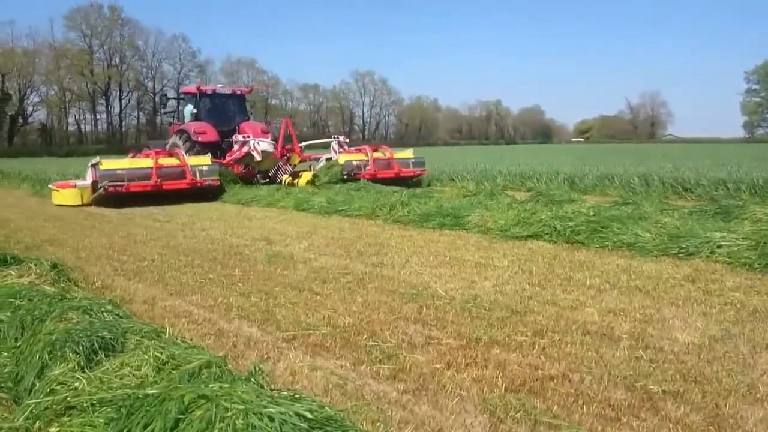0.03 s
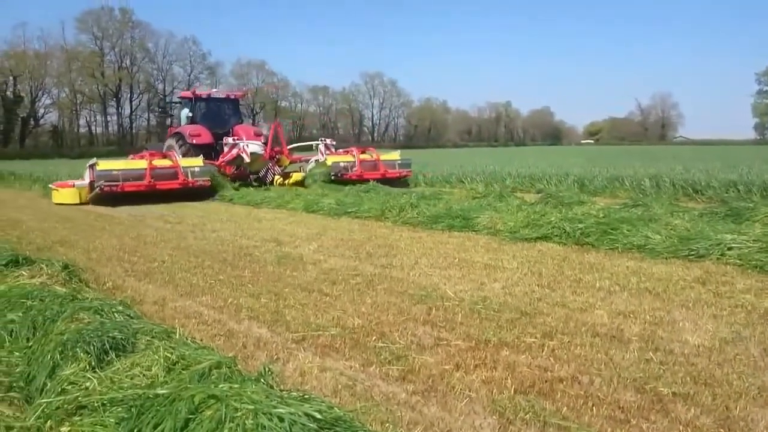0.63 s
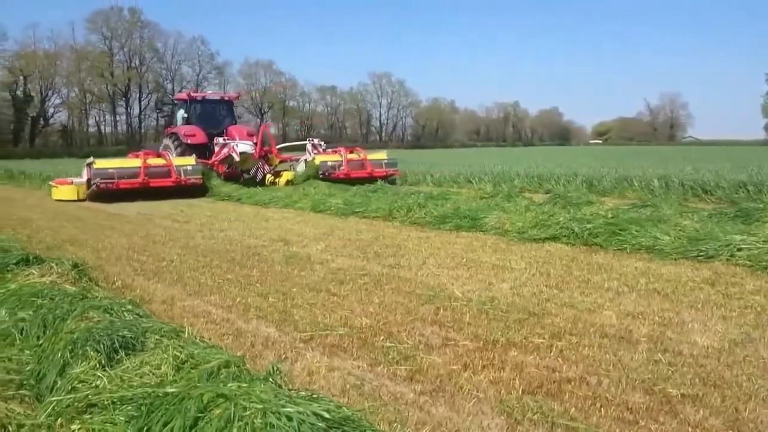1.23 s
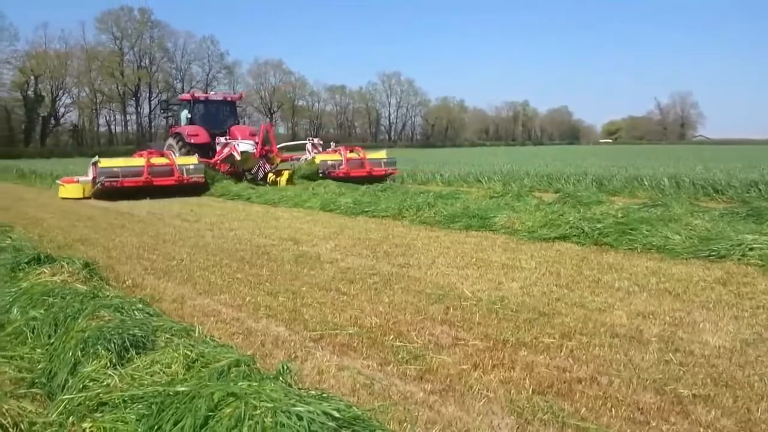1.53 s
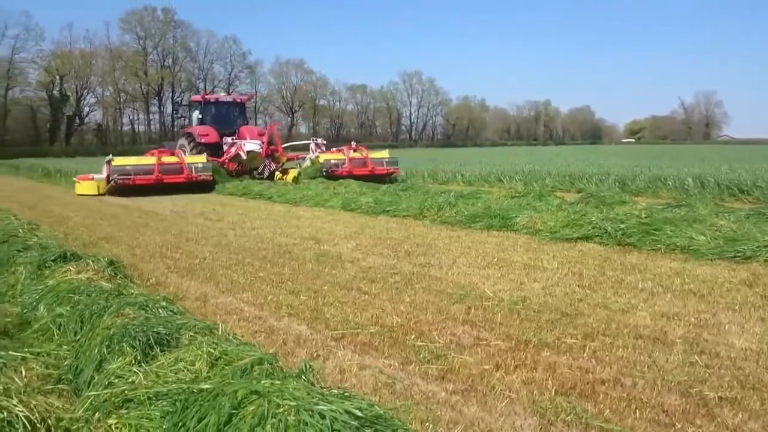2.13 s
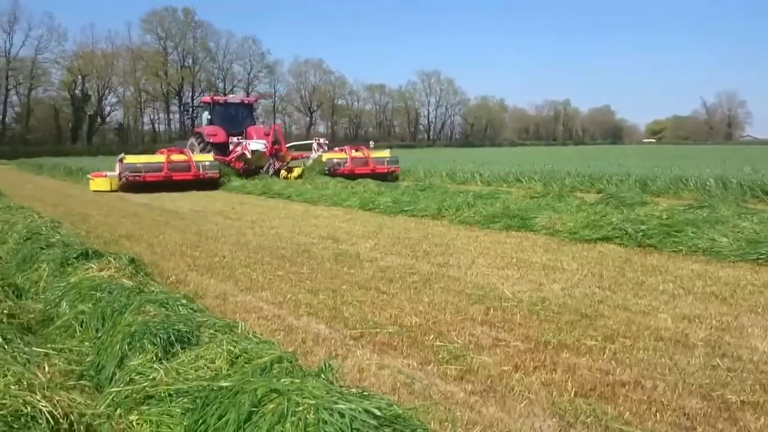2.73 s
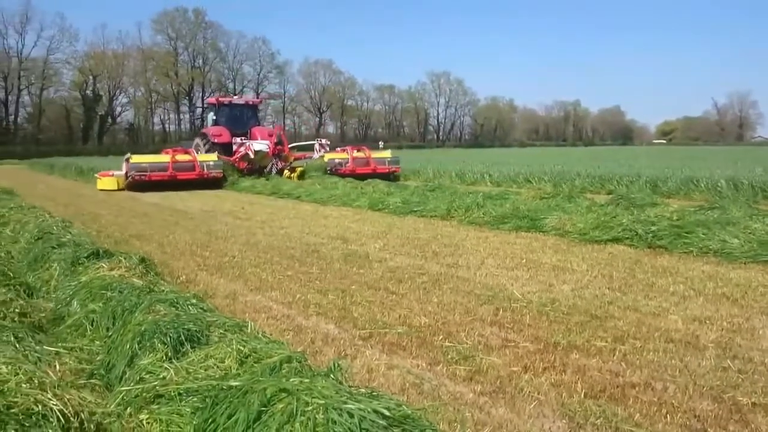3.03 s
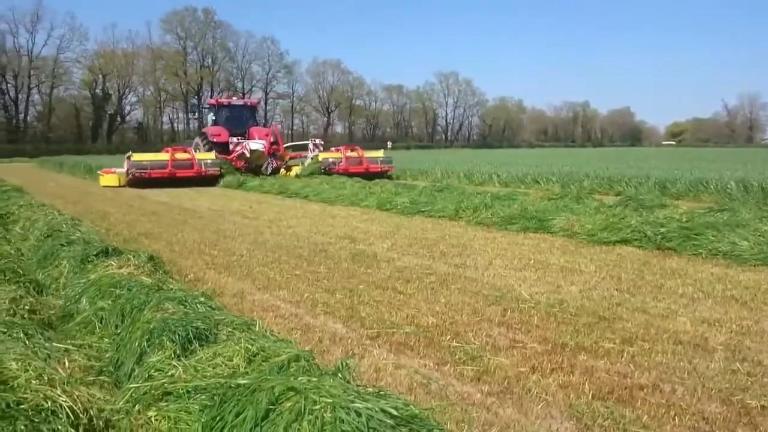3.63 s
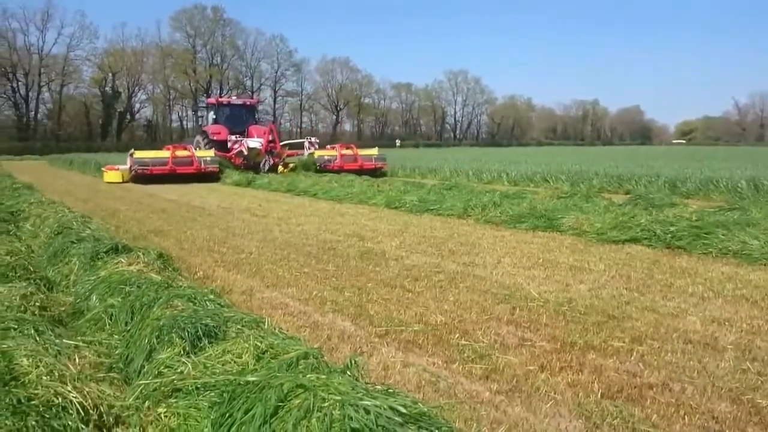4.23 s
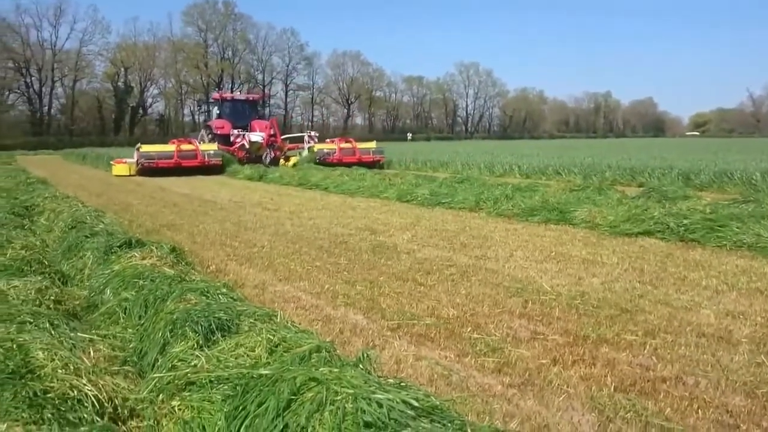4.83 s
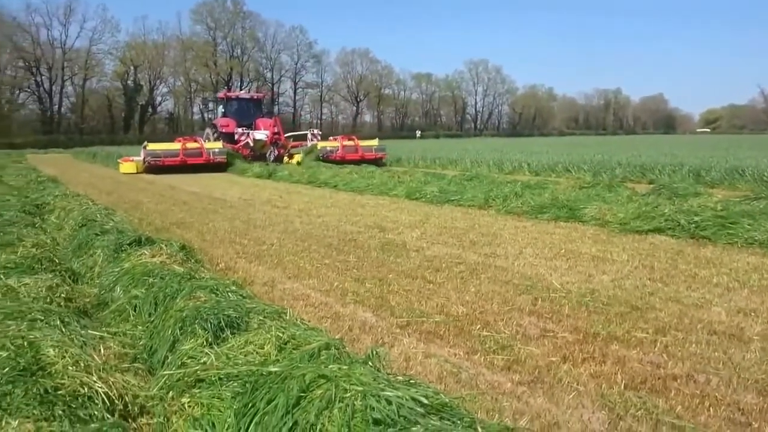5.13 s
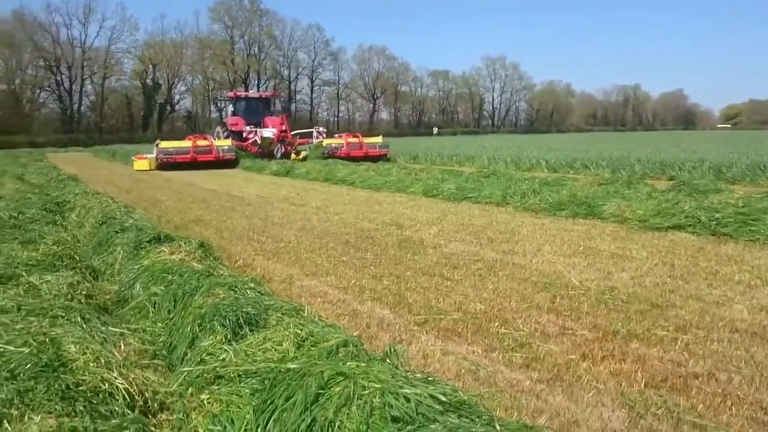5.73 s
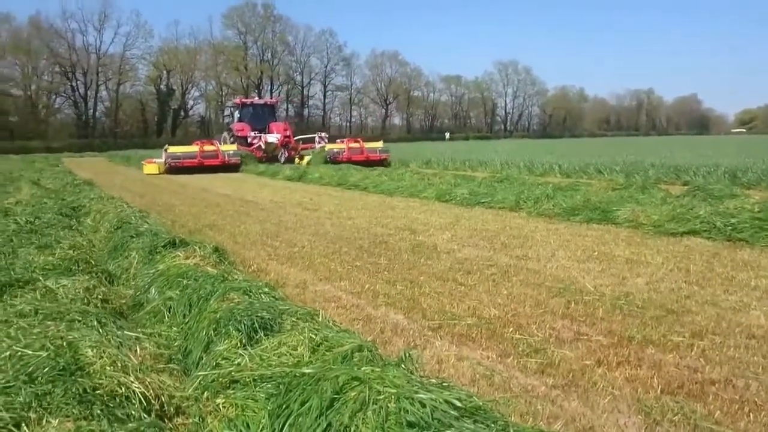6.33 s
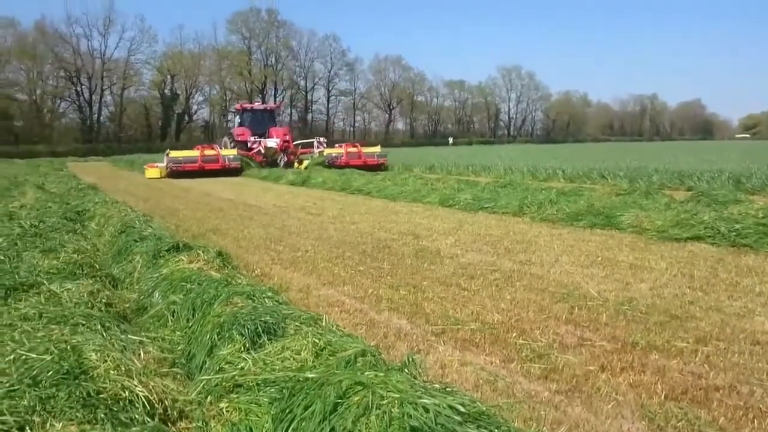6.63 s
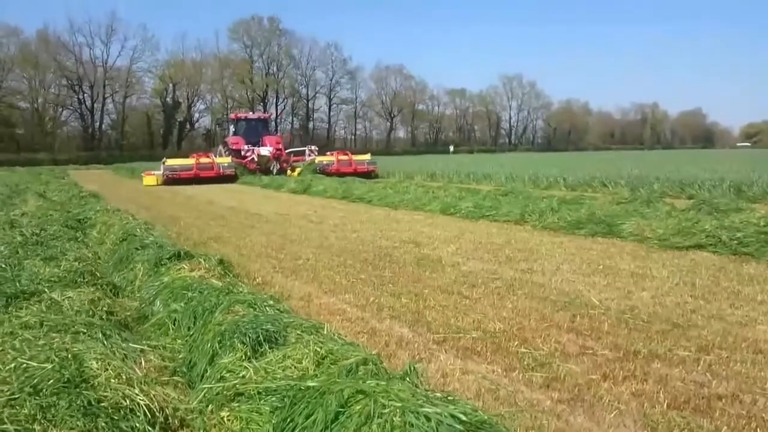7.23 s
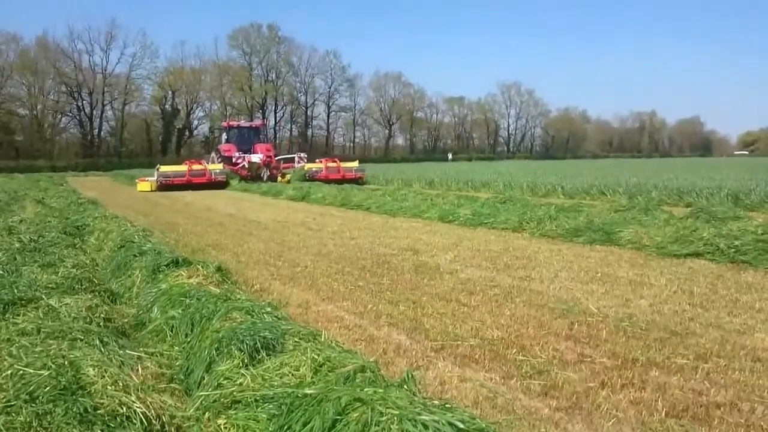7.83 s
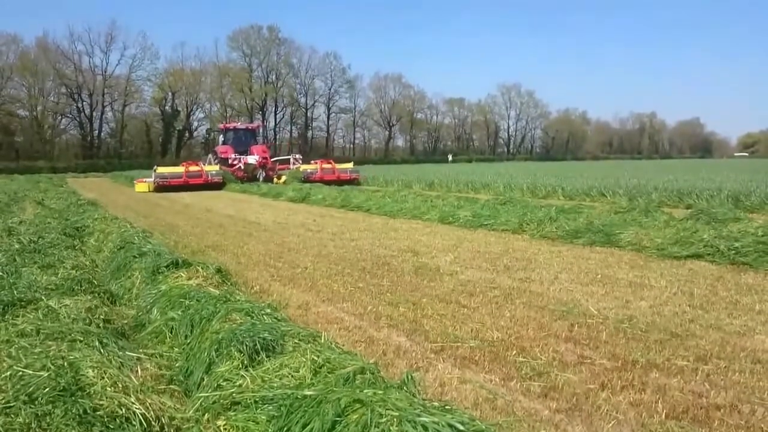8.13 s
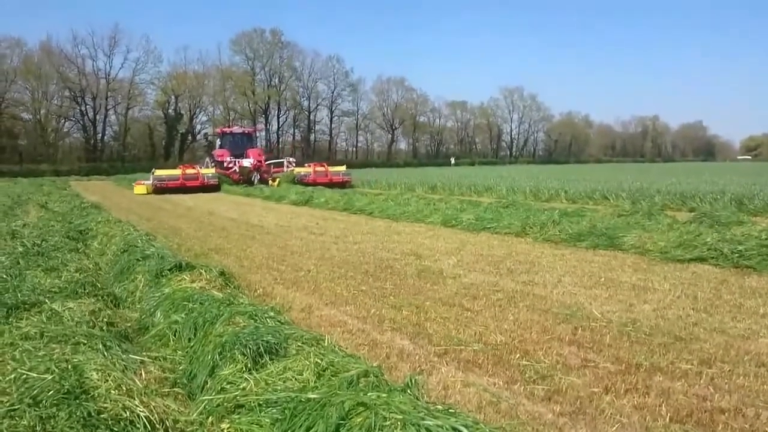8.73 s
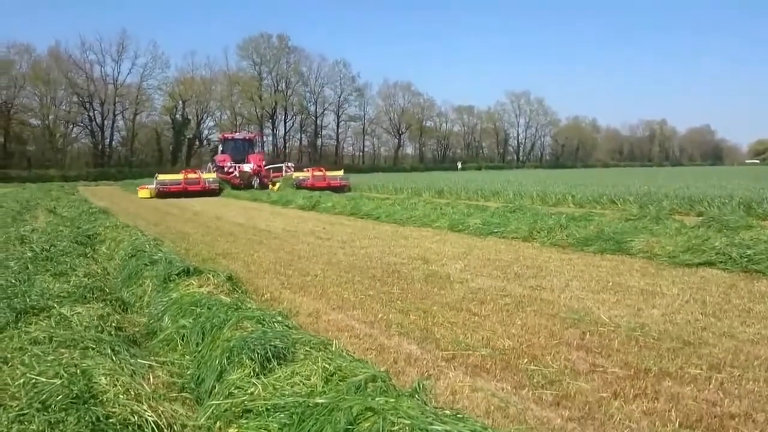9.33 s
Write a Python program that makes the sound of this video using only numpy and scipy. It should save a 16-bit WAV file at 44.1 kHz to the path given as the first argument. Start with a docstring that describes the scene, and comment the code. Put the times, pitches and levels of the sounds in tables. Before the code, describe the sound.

In an open field, a tractor engine drones at a constant pitch while its mowers make a bright, fluttering hiss and a metallic clatter. Now and then a blade ticks on a stone. The machine gradually recedes, the hiss growing duller while the low drone holds, and a faint gear whine comes in late. Small gusts thump the microphone, with one brief pop.

```python
"""An open field, where a six-cylinder tractor pulls disc mowers away. Periodic firing makes the exhaust
drone, and the discs hum and a gearbox whines at fixed ratios of the firing rate. The knives hiss in the
grass and tick on stones; steel hoods rattle and skimming discs ring at their resonances. Light wind
bumps a stereo microphone whose two channels carry the tractor's bass in opposite polarity."""
import sys
import numpy as np
from scipy import signal
from scipy.fft import rfft, irfft, next_fast_len
from scipy.io import wavfile
from scipy.ndimage import uniform_filter1d, map_coordinates

SR = 44100
rng = np.random.default_rng(int(sys.argv[2]) if len(sys.argv) > 2 else 0)


def wrap_up_sound(samples):
    """Save the sound to the file named by the first command line argument, as 16-bit audio."""
    columns = np.atleast_2d(samples).T
    # keep every value between -1 and 1, then stretch to whole-number steps
    tamed = np.clip(columns, -1, 1)
    steps = np.round(tamed * 32767).astype(np.int16)
    wavfile.write(sys.argv[1], SR, steps)


N = 414540

# Drone: t/s, firing tone level/dB, mower shaft level/dB, firing octave level/dB
DRONE_LEVELS = [(.5, -20.5, -30, -39), (1.9, -25, -30.5, -40), (2.3, -24, -28, -39), (2.5, -22, -26, -31),
                (3.15, -24.5, -25.7, -30.5), (3.8, -22.3, -25.8, -31.5), (6, -21.7, -28, -31),
                (7.2, -21.5, -33, -34), (8, -22.3, -29.5, -31.5), (8.8, -20.3, -32, -33),
                (9.4, -21.5, -29, -38)]
# Exhaust orders: multiple of the firing rate, top level/dB, t of top/s, slope either side/(dB/s)
EXHAUST_ORDERS = [(.5, -41, 5, .2), (1.5, -44, 5, .3), (2.5, -48, 3, .5), (3, -43, 6.5, .6),
                  (4, -39.4, 4.2, 2.8), (5, -41.5, 1.2, 2.4), (6, -37, 4.9, 3.2), (7, -38.8, 4.8, 3.2),
                  (8, -40.8, 1.7, 2.0), (9, -44.5, 5.5, .7), (12, -54, 4, .7), (13.5, -54, 1, 1),
                  (15, -51, 4, .5), (18, -51, 3, .9), (22.5, -50.5, 3, .9), (24, -48.5, 4, .5),
                  (26.5, -51, 2, 1), (27, -46.5, 1, 1.3), (37, -41, 1.4, 7), (39, -44.5, 3, .7)]
def exhaust(firing):
    """Beating: the firing tone throbs against a slightly faster mower shaft while other orders swell."""
    beat_hz, crest_s, shaft_octave_db = 2.353, 2.5, -16
    beat = np.exp(2j * np.pi * beat_hz * (clock() - crest_s))
    drone, shaft, octave = (amp(curve(DRONE_LEVELS, column=k)) for k in (1, 2, 3))
    lines = tone(firing, 1, drone + shaft * beat, waver=.08)
    lines += tone(firing, 2, octave * (1 + amp(shaft_octave_db) * beat ** 2), waver=.3)
    for multiple, top_db, top_s, fall_db in EXHAUST_ORDERS:
        lines += tone(firing, multiple, swell(top_db, top_s, fall_db), waver=.3 + .016 * multiple)
    return lines


# Spectra of the rumble and the near roar: f/Hz, relative level/dB
RUMBLE_SPECTRUM = [(20, -18), (32, -15), (59, -3), (104, -.5), (212, -2), (310, -9), (400, -15), (470, -21),
                   (610, -12.5), (850, -12.5), (1030, -23), (1500, -45), (3000, -90)]
ROAR_SPECTRUM = [(50, -12), (110, 5), (250, -6), (500, -7.5), (900, -69)]
def exhaust_noise(firing):
    """Amplitude modulation: a rumble puffs with each firing; a centred roar flutters and recedes."""
    puffs = patchy_noise(patchy_db=1.3) * (1 + .2 * np.cos(firing))
    rumble = amp(-24 + spreading_db()) * picked_up(puffs, RUMBLE_SPECTRUM)
    roar = unit(coloured_noise(ROAR_SPECTRUM, N))
    roar_db = -40 - 2.4 * clock() + 3.3 * wobble(14)
    return rumble + amp(roar_db) * roar


# Cutting strength in thicker and thinner grass: t/s, level/dB
CUTTING = [(0, -25.5), (.1, -23.5), (.39, -26), (.52, -24.5), (.67, -26.5), (.73, -24.5), (1, -27),
           (1.2, -24.5), (1.4, -25), (1.7, -26), (1.9, -26.5), (2.15, -26), (2.5, -27.5), (2.65, -27.5),
           (3.03, -27.5), (3.15, -28), (3.54, -27.5), (3.63, -28), (4.34, -28.5), (4.48, -29.5),
           (4.85, -29.5), (5, -29.5), (5.38, -30), (5.5, -28.5), (6.3, -28.5), (6.43, -28.5), (6.6, -30),
           (7.05, -28), (7.53, -30), (7.72, -28), (7.91, -29), (8.22, -27.5), (8.4, -28.5), (8.54, -30.5),
           (8.69, -29.5), (8.86, -30.3), (8.94, -27), (9.16, -28.5), (9.4, -29)]
# Spectra of the near hiss, the far hiss and the fizz: f/Hz, relative level/dB
NEAR_HISS = [(1500, -38), (2900, -10), (3300, -6.5), (4100, 2.5), (4550, 1.5), (5070, -0.5), (5750, -1),
             (6200, -5), (7100, -17), (8000, -21.5), (10000, -42), (13000, -89.5)]
FAR_HISS = [(1500, -36), (2900, -8.5), (3300, -8), (3750, 2.5), (4250, 3), (4750, 1.5), (5100, -3.5),
            (5780, -1.5), (6200, -8), (7100, -17), (8000, -24), (10000, -31), (13000, -89)]
FIZZ_SPECTRUM = [(4000, -30), (7000, -4), (8500, 0), (9800, 0), (11000, -2), (11800, -5), (13000, -4.5)]
def knives():
    """Air absorption: cut grass hisses in uneven wads, and its treble dies faster with distance."""
    hiss_over_cut_db, fizz_over_cut_db, air_loss_db_per_s, dull_at_s = 2.5, -14, 1.19, 13.4
    cut_db = curve(CUTTING)
    # the crop feeds through in regular surges and random clumps
    surge = np.sin(2 * np.pi * 11.3 * clock() + wobble(2))
    wads = amp(.45 * (wobble(34) + wobble(160) + surge))
    stalks = wads * (patchy_noise(patchy_db=3.6, size=3) + .3 * snaps(rate=700, spread_db=4.5))
    far = np.minimum(clock() / dull_at_s, 1)
    hiss = (1 - far) * picked_up(stalks, NEAR_HISS) + far * picked_up(stalks, FAR_HISS)
    grains = patchy_noise(patchy_db=6.5, size=9) + .4 * snaps(rate=250, spread_db=4.5)
    fizz = picked_up(grains, FIZZ_SPECTRUM)
    fizz_flicker_db = 1.3 * wobble(22) + .7 * wobble(5)
    fizz_db = cut_db + fizz_over_cut_db - air_loss_db_per_s * clock() + fizz_flicker_db
    return amp(cut_db + hiss_over_cut_db) * hiss + amp(fizz_db) * fizz


def snaps(rate, spread_db):
    """Shot noise: stalks and grit hit the hoods as sparse impulses of widely differing size."""
    hits = rng.random((2, N)) < rate / SR
    size = amp(spread_db * np.minimum(rng.exponential(size=(2, N)), 4))
    return unit(hits * size * np.sign(rng.standard_normal((2, N))))


# Spectrum of the steel hoods: f/Hz, relative level/dB
HOOD_SPECTRUM = [(400, -36), (900, -9), (1030, -11), (1200, -6.5), (1445, -.8), (1744, -1.6), (1900, 1.6),
                 (2080, .3), (2220, -5.5), (2370, .3), (2540, .8), (2688, -7), (2840, 2.5), (3090, -7.5),
                 (3300, -3), (4200, -64)]
def hoods(firing):
    """Forced vibration: the hoods clatter with the engine and follow part of the load of grass."""
    rattle = patchy_noise(patchy_db=3.4, size=4) * (1 + .07 * np.cos(firing)) * amp(.45 * wobble(60))
    load_db = curve(CUTTING) - CUTTING[0][1] - spreading_db()
    return amp(-27.5 + spreading_db() + .38 * load_db) * picked_up(rattle, HOOD_SPECTRUM)


# Disc hum: multiple of the firing rate, level/dB
DISC_ORDERS = [(.9055, -33), (1.358, -43), (1.811, -44)]
# Gear whine: t/s, level/dB
WHINE_LEVEL = [(3, -62), (5.5, -52), (6.5, -47), (7.2, -43), (8.8, -42), (9.4, -44)]
def drivetrain(firing):
    """Rotational harmonics: the discs hum and a gear mesh whines, both geared to the engine."""
    hum = sum(tone(firing, multiple, amp(level_db), waver=.25) for multiple, level_db in DISC_ORDERS)
    whine = tone(firing, 33.75, amp(curve(WHINE_LEVEL)), waver=.6)
    return hum + whine


# Two narrow bands of hiss: f/Hz, bandwidth/Hz, relative level/dB
HISS_BANDS = [(3340, 100, 0), (3470, 110, -3)]
# Their level, which fades early and returns past halfway: t/s, level/dB
HISS_BAND_LEVEL = [(0, -37), (2.5, -63), (5.4, -62), (6.1, -37), (7.4, -36.5), (9.4, -37.5)]
def narrow_hiss():
    """Band-pass filtering: two narrow bands of hiss near 3.4 kHz, louder on the left."""
    bands = filtered(patchy_noise(patchy_db=5.5), lambda hz: band_pass(HISS_BANDS, hz))
    return amp(curve(HISS_BAND_LEVEL)) * unit(bands * amp([[4], [-4]]))


# Discs skimming the stubble: t/s, top level/dB, f/Hz
DISC_SKIMS = [(1.25, -34, 4250), (2.95, -33, 4315), (3.5, -31.5, 4325), (4.15, -35, 4340),
              (5.3, -38.5, 4260), (6.15, -30, 4300), (6.5, -34.5, 4345), (8.15, -34, 4250)]
def skims():
    """Noise-driven resonance: each skim makes a disc ring, swelling and fading at its own pitch."""
    width_hz = 18
    out = np.zeros((2, N))
    for s, top_db, centre in DISC_SKIMS:
        scrape = rng.standard_normal((2, N))
        ring = unit(filtered(scrape, lambda hz: band_pass([(centre, width_hz, 0)], hz)))
        out += swell(top_db, s, fall_db=13) * np.abs(ports(centre))[:, None] * ring
    return out


# Stones flicked by the knives: t/s, envelope peak/dB, f/Hz
STONE_HITS = [(0.116, -18, 4350), (1.9525, -15, 4350), (3.008, -17.5, 7500), (4.274, -12, 4350),
              (5.643, -13, 4350), (9.028, -13, 4350)]
def stones():
    """Impact excitation: a knife flicks a stone, giving one bright, heavily damped tick."""
    rise_s, t60_s = .00017, .004
    ticks = np.zeros((2, N))
    for s, peak_db, hz in STONE_HITS:
        age = np.maximum(clock() - s, 0)
        envelope = (1 - np.exp(-age / rise_s)) * amp(-60 * np.minimum(age / t60_s, 2))
        tick = amp(peak_db) * envelope / envelope.max() * np.sin(2 * np.pi * hz * age)
        ticks += np.outer(np.abs(ports(hz)), tick)
    return ticks


# Spectra of the low and high eddies: f/Hz, relative level/dB
LOW_EDDIES = [(15, -38), (30, -7), (45, -2.5), (60, 1), (110, 0), (170, -16.5), (280, -25.5), (500, -66)]
HIGH_EDDIES = [(30, -20), (80, -7.5), (150, -1), (240, -5), (350, -12), (700, -63)]
# The breeze slackens, then freshens: t/s, base level/dB
BREEZE_LEVEL = [(0, -44), (1.2, -44), (1.7, -45), (2.2, -47), (2.7, -48), (3.7, -45.5), (4.8, -48.5),
                (5.5, -47.5), (6.1, -46), (6.7, -44), (7.2, -43), (8, -42), (8.6, -42.5), (9.4, -43)]
def breeze():
    """Turbulent pressure: low eddies follow the choppy breeze; high ones come and go in puffs."""
    strength = amp(curve(BREEZE_LEVEL) + 4.5 * np.minimum(wobble(24), 1))
    puffs = amp(6 * np.minimum(wobble(11), 1))
    return strength * (amp(6) * eddies(LOW_EDDIES) + amp(-5) * puffs * eddies(HIGH_EDDIES))


def eddies(spectrum):
    """Incoherence: lumpy pressure noise, unrelated at the two microphone ports."""
    return unit(coloured_noise(spectrum) * amp(3.2 * np.array([wobble(25), wobble(25)])))


# Gusts: t/s, half length/s, low eddy level/dB, high eddy level/dB
GUST_THUMPS = [(0.125, 0.026, -23, -32), (1.605, .03, -34, -38), (2.403, .015, -37, -42),
               (2.5, .02, -37, -54), (2.773, .04, -39, -54), (3.34, .018, -31, -46),
               (3.47, 0.017, -35.5, -53), (3.752, 0.053, -34, -44), (4.074, 0.033, -34, -34),
               (4.416, .025, -34, -38.5), (4.828, .018, -38, -44), (4.952, 0.023, -38.5, -44),
               (5.248, 0.015, -30, -44), (5.36, 0.023, -37, -41), (5.71, 0.036, -35, -50),
               (6.181, 0.02, -31, -42), (6.37, .02, -28, -41), (6.438, 0.026, -24, -27.5),
               (6.55, 0.022, -35, -39), (7.09, 0.032, -24.5, -43), (7.228, .03, -31, -38),
               (7.38, 0.012, -24.5, -39), (7.773, .02, -34.5, -32), (7.903, 0.027, -25, -33),
               (7.954, .016, -33, -43), (8.048, .018, -30, -41.5), (8.148, 0.023, -22.5, -35),
               (8.27, 0.029, -25.5, -30.5), (8.394, 0.018, -33, -35.5), (8.92, 0.035, -29, -38),
               (9.025, 0.023, -28, -33), (9.1, 0.022, -30, -40), (9.29, 0.025, -36, -43),
               (9.364, 0.016, -24, -41)]
def thumps():
    """Pressure transients: single gusts thump the microphone with short bursts of eddies."""
    deep = sum(amp(low_db) * bump(s, half_s) for s, half_s, low_db, _ in GUST_THUMPS)
    sharp = sum(amp(high_db) * bump(s, half_s) for s, half_s, _, high_db in GUST_THUMPS)
    return deep * even_eddies(LOW_EDDIES) + sharp * even_eddies(HIGH_EDDIES)


def even_eddies(spectrum):
    """Envelope flattening: noise over its running rms gives a thump a body of even strength."""
    noise = coloured_noise(spectrum)
    shared, apart = noise / np.sqrt(np.abs(uniform_filter1d(noise ** 2, size=900, axis=1)) + 1e-20)
    return unit(np.array([shared + apart, shared - apart]))


# Wind pop: t/s, pulse peak/dB, f/Hz
WIND_POPS = [(6.9836, -8, 425)]
def pops():
    """Pressure pulse: wind pops the left port for about one cycle, with a faint scuff of noise."""
    left = np.zeros(N)
    for s, peak_db, hz in WIND_POPS:
        cycles = (clock() - s) * hz
        pulse = np.cos(2 * np.pi * cycles) * np.exp(-(cycles / .62) ** 2)
        scuff = unit(filtered(rng.standard_normal(N), lambda f: np.exp(-(f / hz - 1) ** 2 * 4)))
        left += amp(peak_db) * (pulse + amp(-18.5) * scuff * np.exp(-np.abs(cycles) / 8))
    return np.outer([1, 0], left)


# Lulls: t/s, half length/s, deep bass dip/dB, upper bass dip/dB
BASS_LULLS = [(1.176, 0.03, 22, 18), (2.06, .014, 14, 14), (2.255, 0.018, 20, 20), (2.62, 0.05, 18, 26),
              (2.92, 0.075, 53, 45), (3.05, .025, 19, 22), (3.38, .012, 16, 10), (3.535, .02, 18, 22),
              (4.257, 0.02, 23, 23), (4.75, .032, 29, 29), (4.93, .09, 0, 9), (5.425, .014, 18, 12),
              (5.53, .06, 6, 18), (5.9, .11, 0, 14), (6.76, .11, 1, 12), (7.42, .014, 12, 14),
              (7.57, .03, 0, 12), (8.777, 0.018, 13, 5)]
def lulled(pair):
    """Common-mode attenuation: the bass that the two channels share dips briefly."""
    below = lambda edge_hz: filtered(pair.mean(axis=0), lambda hz: 1 / (1 + (hz / edge_hz) ** 20))
    deep, bass = below(edge_hz=150), below(edge_hz=370)
    deep_db = -sum(dip_db * bump(s, half_s) for s, half_s, dip_db, _ in BASS_LULLS)
    upper_db = -sum(dip_db * bump(s, half_s) for s, half_s, _, dip_db in BASS_LULLS)
    return pair - (1 - amp(deep_db)) * deep - (1 - amp(upper_db)) * (bass - deep)


# Channel balance: f/Hz, left minus right level/dB
BALANCE = [(61, 0), (390, 0), (761, -6), (1235, -5), (1466, 0.5), (2530, -2), (2839, 7), (3159, -7),
           (4053, 8), (4306, 5), (5415, -1.5), (5827, -4.5), (7819, 0), (12997, -1)]
# Channel phase: f/Hz, lead of the left/rad
PHASE_LEAD = [(100, 3.06), (200, 3.14), (320, 3.14), (425, 2.5), (520, 3.7), (640, 3.4), (900, 3.5),
              (1200, 4.2), (2000, 4.25), (2240, 3.55), (2670, 5.1), (2930, 3.9), (3300, 5.4), (4220, 5.4),
              (4650, 4.2), (6000, 5.9)]
def ports(hz):
    """Level and phase differences: complex left and right gains for sound from the tractor."""
    half_db, lead = along(BALANCE, hz) / 2, along(PHASE_LEAD, hz)
    gains = np.array([amp(half_db) * np.exp(.5j * lead), amp(-half_db) * np.exp(-.5j * lead)])
    return gains / np.sqrt(np.mean(np.abs(gains) ** 2, axis=0))


# Likeness of the channels: f/Hz, coherence (0 to 1)
COHERENCE = [(290, 1), (350, .99), (480, .85), (750, .87), (1050, .55), (1500, .68), (2250, .68),
             (4000, .48), (5500, .2), (8000, .1), (11000, .45), (13000, .2)]
def picked_up(pair, spectrum):
    """Partial coherence: two unrelated signals are coloured and blended into two channels at rms 1."""
    def blend(hz):
        angle = np.arccos(np.clip(along(COHERENCE, hz), 0, 1)) / 2
        return amp(along(spectrum, hz)) * [np.cos(angle), np.sin(angle)]
    shared, apart = filtered(pair, blend)
    return unit(filtered(np.array([shared + apart, shared - apart]), ports))


def tone(firing, multiple, gain, waver):
    """Scintillation: moving air makes a line locked to the crankshaft waver, faster at high pitch."""
    rate = 7 + .4 * multiple
    flutter = 1 + waver * (wobble(rate) + 1j * wobble(rate))
    phase = multiple * firing + np.angle(flutter) + rng.uniform(0, 2 * np.pi)
    line = unit(np.abs(flutter)) * np.exp(1j * phase)
    return np.sqrt(2) * np.real(ports(multiple * FIRING_RATE[0][1])[:, None] * gain * line)


def spreading_db():
    """Spherical spreading: the level falls as the tractor drives straight away."""
    start_m, speed_m_per_s = 16.6, 2.97
    return -20 * np.log10(1 + speed_m_per_s * clock() / start_m)


def band_pass(bands, hz):
    """Parallel filters: the summed response of second-order pass bands."""
    return sum(amp(db) * 1j * hz * width / (centre ** 2 - hz ** 2 + 1j * hz * width)
               for centre, width, db in bands)


def patchy_noise(patchy_db, size=7):
    """Random modulation: two noises with patches of gain in time and pitch; a small size is restless."""
    spectra = signal.stft(rng.standard_normal((2, N)), nperseg=1024)[2]
    field = rng.standard_normal(spectra.shape[1:])
    field = uniform_filter1d(uniform_filter1d(field, size=size, axis=0), size=size, axis=1)
    return signal.istft(spectra * amp(patchy_db * np.minimum(unit(field), 1)), nperseg=1024)[1][:, :N]


def coloured_noise(spectrum, shape=(2, N)):
    """Spectral shaping of white noise."""
    return filtered(rng.standard_normal(shape), lambda hz: amp(along(spectrum, hz)))


def filtered(x, response):
    """Linear filtering: the spectrum of x times a complex frequency response."""
    size = next_fast_len(N + SR // 2)
    return irfft(rfft(x, size) * response(np.fft.rfftfreq(size, 1 / SR)), size)[..., :N]


def wobble(rate):
    """Spline interpolation of random knots, rate knots a second."""
    knots = rng.standard_normal(int(N * rate / SR) + 4)
    steps = np.arange(len(knots) * 10 - 10) / 10
    return np.interp(clock() * rate, steps, map_coordinates(knots, [steps]))


def swell(top_db, top_s, fall_db):
    """Exponential growth and decay about a top, at fall_db a second."""
    return amp(top_db - fall_db * np.abs(clock() - top_s))


def bump(s, half_s):
    """Gaussian envelope of height 1 around time s."""
    return np.exp(-np.minimum(((clock() - s) / half_s) ** 2, 20))


def curve(rows, column=1):
    """Linear interpolation of one column over time."""
    table = np.transpose(rows)
    return np.interp(clock(), table[0], table[column])


def along(points, hz):
    """Interpolation on a logarithmic frequency axis."""
    f, values = np.transpose(points)
    return np.interp(np.log(hz + 1), np.log(f + 1), values)


def amp(db):
    """Amplitude ratio of a level in decibels."""
    return 10 ** (np.asarray(db) / 20)


def unit(x):
    """Normalisation to rms 1."""
    return x / np.sqrt(np.mean(x ** 2) + 1e-20)


def clock():
    """Uniform sampling: t/s of each sample."""
    return np.arange(N) / SR


# Engine firing rate: t/s, f/Hz
FIRING_RATE = [(0, 106.2), (0.7, 106.2), (2.5, 105.9), (3.6, 105.95), (5.1, 105.73), (5.8, 106.0),
               (6.5, 105.77), (7.6, 105.63), (9.4, 105.8)]
def scene():
    """Superposition: machine and wind add, and everything that turns follows the crankshaft."""
    firing = 2 * np.pi * np.cumsum(curve(FIRING_RATE)) / SR  # phase/rad
    tractor = exhaust(firing) + exhaust_noise(firing)
    mowers = drivetrain(firing) + hoods(firing) + narrow_hiss() + knives() + skims() + stones()
    wind = breeze() + thumps() + pops()
    return lulled(tractor + mowers + wind)


def record(dry):
    """Band limiting: an ideal low-pass filter removes the highest treble."""
    return filtered(dry, lambda hz: hz < 13080)


dry = scene()
out = record(dry)
wrap_up_sound(out)
```